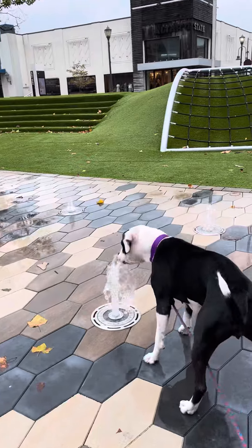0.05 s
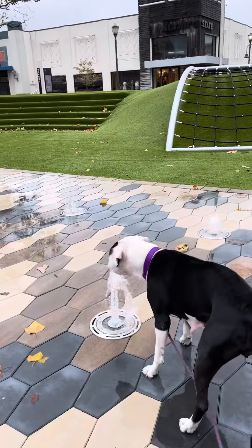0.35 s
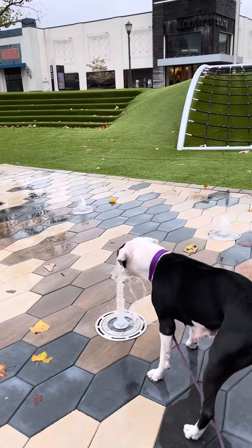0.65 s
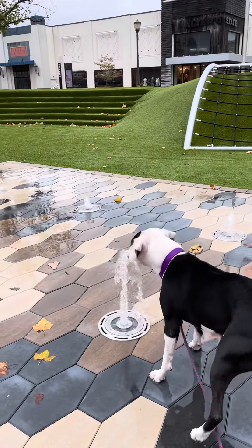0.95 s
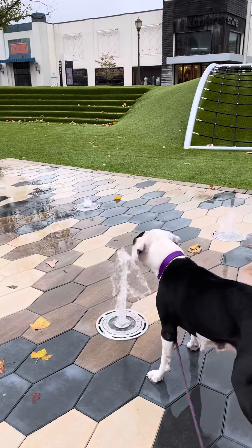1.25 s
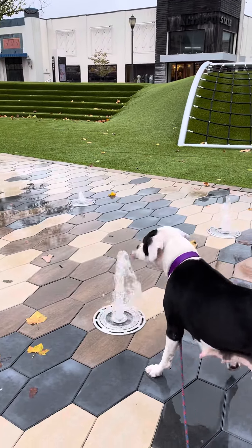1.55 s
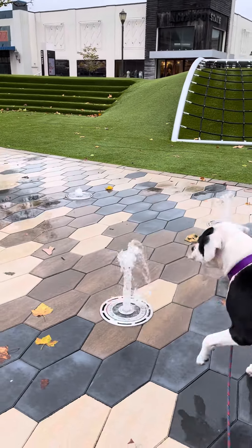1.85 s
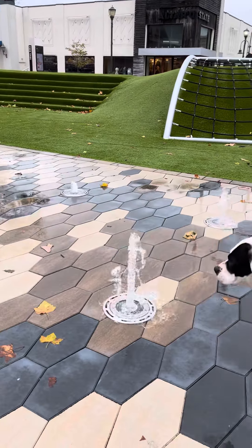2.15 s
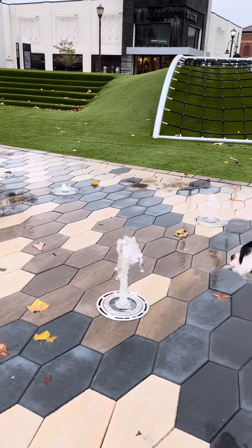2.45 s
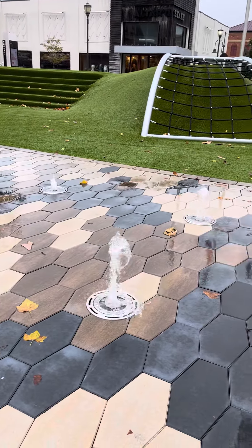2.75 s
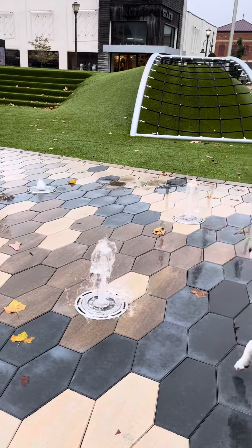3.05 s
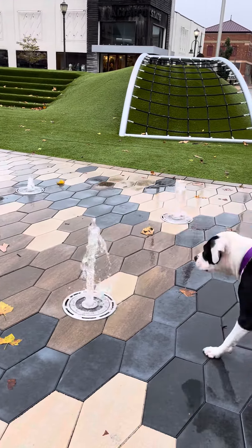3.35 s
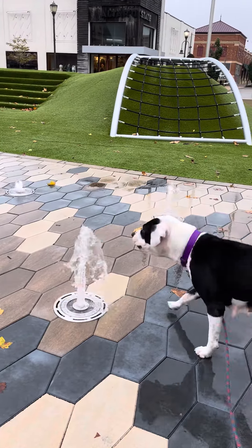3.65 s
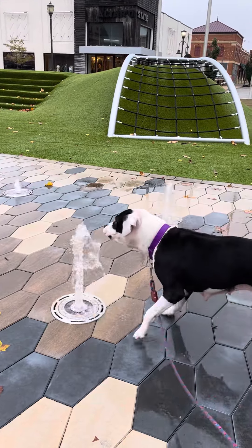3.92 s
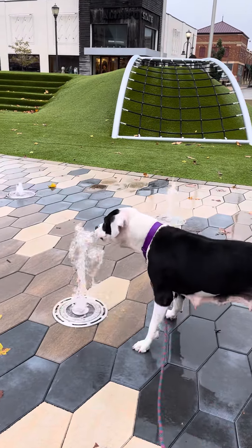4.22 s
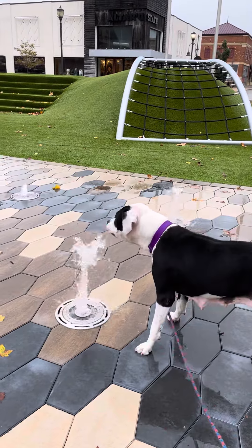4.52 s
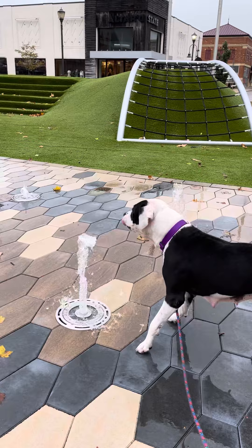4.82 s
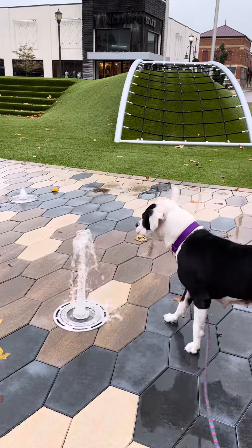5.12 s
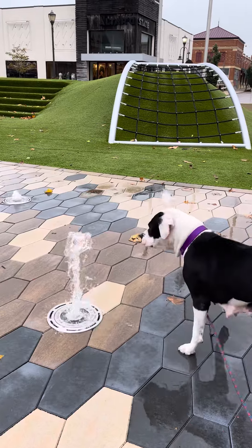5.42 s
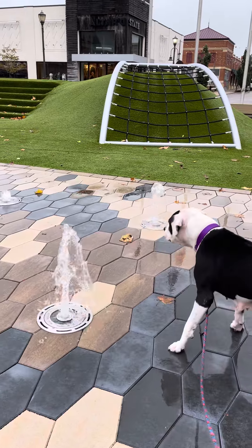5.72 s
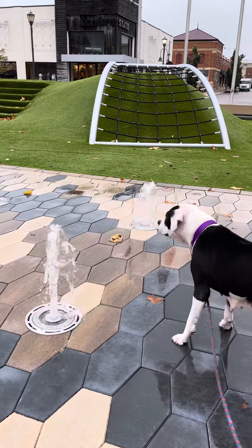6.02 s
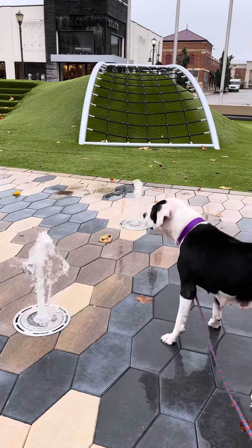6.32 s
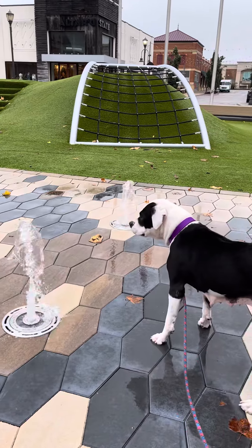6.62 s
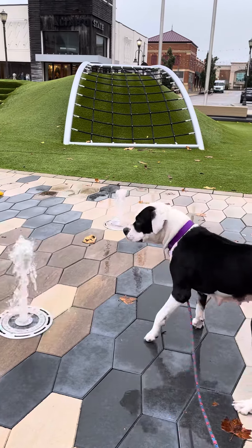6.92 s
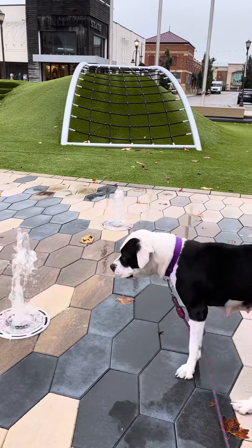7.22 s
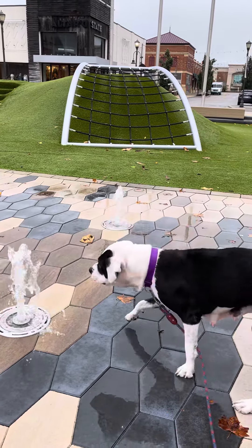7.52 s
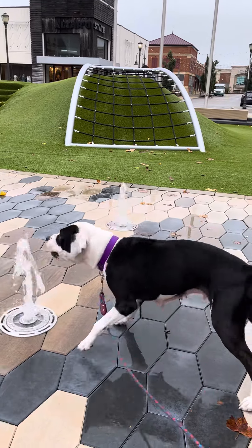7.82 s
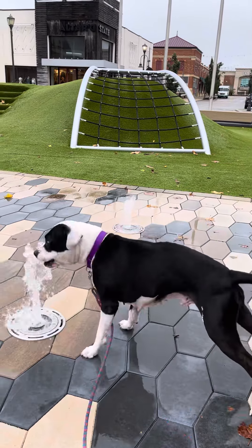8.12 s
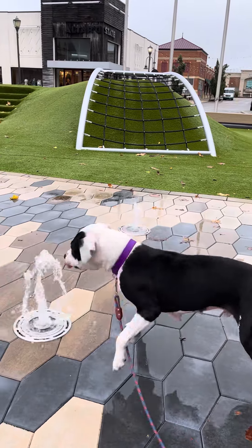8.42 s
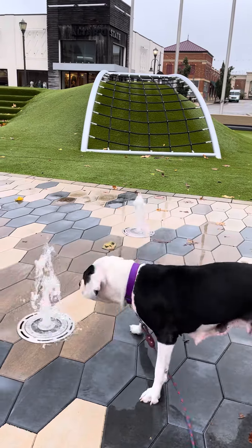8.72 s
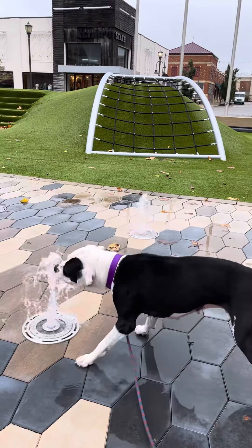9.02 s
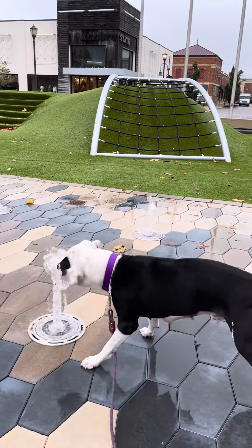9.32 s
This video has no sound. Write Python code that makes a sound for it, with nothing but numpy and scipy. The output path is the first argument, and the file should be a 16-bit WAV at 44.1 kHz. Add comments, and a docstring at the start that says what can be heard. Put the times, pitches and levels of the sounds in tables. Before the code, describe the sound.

A low fountain jet splashes continuously onto wet paving close to the microphone, a bright crackling spray full of pattering drops, sharp wet slaps, small gurgles and an occasional plop. The flow surges unevenly as the water collapses on itself. Farther jets hiss over the low hum of a town around the open plaza. Wind bumps the microphone softly and rumbles more in the second half.

```python
"""Fountain jet on wet paving

A low jet breaks into clumps and keeps collapsing onto the tiles of a plaza. Impacts radiate as slaps,
patter and crackling spray; air trapped by the water resonates as bubbles and plops. A breeze buffets
the two microphones, and farther jets hiss over the low hum of the town."""
import sys
import numpy as np
from scipy import signal
from scipy.fft import rfft, irfft
from scipy.io import wavfile

SR = 44100
rng = np.random.default_rng(int(sys.argv[2]) if len(sys.argv) > 2 else 0)


def output_pcm(signal):
    """Save a mono or channel-first signal as 16-bit PCM at the path in sys.argv[1].

    Samples are clipped to [-1, 1] before scaling.
    """
    pcm = np.clip(np.atleast_2d(signal).T, -1, 1) * 32767
    wavfile.write(sys.argv[1], SR, np.round(pcm).astype(np.int16))


N = 417186
TIME = np.arange(N) / SR
HZ = np.fft.rfftfreq(N, 1 / SR)

# even fall of water from the near jet: time_s, level_db
EVEN_FALL = [(0, -35.0), (1.8, -34.5), (4.5, -33), (5.7, -32.5), (9.46, -32.5)]
# the top of the column coming down in one splash: centre_s, level_db, length_s
COLUMN_COLLAPSES = [(0.43, -33.5, 0.04), (0.91, -35.5, 0.05), (1.24, -33.0, 0.04), (1.689, -33.5, 0.09),
                    (2.16, -35.5, 0.14), (2.54, -32, 0.07), (2.66, -32.5, 0.14), (2.97, -34.0, 0.14),
                    (3.2, -34.5, 0.1), (3.58, -34.0, 0.1), (3.82, -31.0, 0.08), (3.959, -34.0, 0.04),
                    (4.5, -29.5, 0.07), (4.92, -32.5, 0.12), (5.205, -34.0, 0.07), (5.29, -34.5, 0.05),
                    (5.44, -33.0, 0.05), (6.2, -32.0, 0.07), (6.335, -33.5, 0.03), (6.51, -34.5, 0.05),
                    (6.66, -32.0, 0.025), (6.75, -34.0, 0.06), (7.0, -32.5, 0.1), (7.47, -32.5, 0.11),
                    (8.105, -30.0, 0.05), (9.03, -33.5, 0.09), (9.43, -31.5, 0.05)]


def falling_water():
    """Incoherent sources add in power: the level (dB) of the even fall plus a swell per collapse."""
    swells = sum(amp(db) ** 2 * np.exp(-(2 * (TIME - s) / length) ** 2)
                 for s, db, length in COLUMN_COLLAPSES)
    return 10 * np.log10(amp(curve(EVEN_FALL, TIME)) ** 2 + swells)


def clumps(per_s=130, drain_s=0.004, even_share=0.68):
    """Shot noise in the flow (dB): each clump of water arrives at once and drains exponentially."""
    arrivals = (rng.random(N) < per_s / SR) * rng.uniform(.5, 2, N)
    water = signal.lfilter([1], [1, -np.exp(-1 / (drain_s * SR))], arrivals)
    return 10 * np.log10(even_share + (1 - even_share) * water / water.mean())


# big lumps of water hitting the tiles: start_s, level_db, pitch_hz
BIG_LUMPS = [(0.9949, -17, 2670), (1.4134, -23.5, 1780), (1.6271, -20.5, 1940), (1.6817, -20, 2250),
             (2.1518, -20, 2000), (2.1813, -22, 2040), (2.231, -19, 2770), (2.7143, -19, 2270),
             (2.9948, -22, 2400), (3.1276, -23, 2420), (3.2241, -23, 2040), (3.5168, -20.5, 2000),
             (3.6261, -19, 2300), (3.8375, -17, 2100), (4.0394, -22, 1680), (4.1207, -22, 1780),
             (4.5089, -17, 2550), (4.8816, -21, 2240), (6.1591, -22.5, 2180), (6.2108, -23, 2650),
             (6.2821, -15, 2600), (6.5085, -30, 2200), (6.6543, -21, 2540), (6.7203, -17, 2390),
             (6.9847, -27, 2260), (7.4183, -19.5, 1960), (7.7114, -19, 2740), (8.0198, -17.5, 2200),
             (8.1273, -23, 2150), (8.6054, -17.5, 2300)]


def slaps(lumps):
    """Liquid impact: a lump cracks on stone, expels the air beneath it and traps a little that rings."""
    s, db, hz = np.transpose(lumps)
    crack = bursts(s, db - 12, 2 * hz, decay_s=0.00041, octaves=2.0, size=256)
    knock = np.outer([1, 0], knocks(s, db - 3, 0.9 * hz, cycles=1.4, glide=0.14, size=512))
    ring = rings(s, db - 14, hz, cycles=7.2, glide=0.04, size=2048)
    splat = bursts(s, db - 10.5, hz, decay_s=10 / hz, octaves=0.65, size=2048)
    spatter = bursts(s, db - 17, np.full(len(s), 7000), decay_s=0.024, octaves=0.59, size=2048)
    return crack + knock + ring + splat + spatter


def gurgles(max_lag_s=0.024, per_lump=3):
    """Fragmentation: each big lump sheds bubbles that resonate just after it at other pitches."""
    s, db, lump_hz = np.repeat(BIG_LUMPS, per_lump, axis=0).T
    lag, pitch = rng.random((len(s), 2)).T
    hz = lump_hz * 2 ** (0.65 * (2 * pitch - .7))
    return rings(s + max_lag_s * lag, db - 13, hz, cycles=6.5, glide=0.046, size=1536)


def small_lumps(flow_db, low_hz=2000, high_hz=3600):
    """Jet breakup drops lesser lumps at random: rows of start_s, level_db, pitch_hz."""
    s, db, rank = landings(flow_db, per_s=8.3, spread_db=-2.2)
    return np.transpose([s, db - 30, low_hz * (high_hz / low_hz) ** rank])


# spectrum of fine spray on stone: frequency_hz, density_db
SPRAY_SPECTRUM = [(400, -14), (1200, -22), (2200, -2.5), (3600, -2), (5000, -5), (7000, -2), (9000, 2),
                  (10800, 3), (15500, -25.5)]


def spray(flow_db):
    """Superposed impacts: drops crackle, clumps spatter and the finest merge into a surging hiss."""
    s, db, rank = landings(flow_db, per_s=480, spread_db=-1.0)
    drops = bursts(s, db, 3500 + 9000 * rank, decay_s=0.0009, octaves=0.76, size=128)
    s, db, rank = landings(flow_db, per_s=30, spread_db=-1.0)
    spatter = bursts(s, db, 5000 + 7000 * rank, decay_s=0.018, octaves=0.24, size=2048)
    mist = coloured(noise(), SPRAY_SPECTRUM) * amp(flow_db)
    grains = amp(-2) * coloured(drops, SPRAY_SPECTRUM) + amp(-8) * coloured(spatter, SPRAY_SPECTRUM)
    return np.std(mist) * grains + amp(-3) * mist


def patter(flow_db, level_db=-44.0, centre_hz=2550):
    """Impact on a water film: small lumps pat and splat; low ones are rare, softer and longer."""
    s, db, rank = landings(flow_db, per_s=70, spread_db=1.1)
    octave = np.clip(0.376 * np.log(rank / (1 - rank)), -1.7, .7)
    hz = centre_hz * 2 ** octave
    db = db + 5 * np.minimum(octave, 0)
    pats = np.array([knocks(s, db, hz, cycles=1.47, glide=0.11, size=768, variety=0.9) for _ in range(2)])
    splats = bursts(s, db - 4, hz, decay_s=10.7 / hz, octaves=0.53, size=1024)
    return amp(level_db) * unit(pats + splats)


# single fast drops close by: start_s, level_db
HARD_DROPS = [(1.085, -24), (1.2199, -13), (1.2324, -19), (2.9038, -18.5), (3.3590, -18), (3.5993, -16.5),
              (3.6239, -17.5), (3.8382, -15), (4.0208, -22), (4.4780, -17), (4.7535, -19), (4.8985, -21),
              (4.922, -20), (4.9565, -16), (4.9692, -16), (5.0987, -16.5), (5.1623, -14.5), (5.3093, -13),
              (6.3421, -20), (6.9453, -22), (7.1781, -17), (7.7118, -15.5), (8.1172, -19.5), (8.4868, -13),
              (9.4155, -14)]


def ticks(drops, centre_hz=8200):
    """Brief contact gives a bright spectrum: fast drops crack on bare tile and scatter."""
    s, db = np.transpose(drops)
    hz = np.full(len(s), centre_hz)
    crack = bursts(s, db + 2.5, hz, decay_s=0.001, octaves=0.45, size=512)
    scatter = bursts(s, db - 14, hz, decay_s=0.008, octaves=0.6, size=1024)
    return crack + scatter


def stray_drops(flow_db):
    """Splashing ejects lesser hard drops at random: rows of start_s, level_db."""
    s, db, _ = landings(flow_db, per_s=26, spread_db=1.0)
    return np.transpose([s, db - 29])


def bubbles(flow_db, level_db=-47.0, low_hz=1500, high_hz=4600, tilt_db=6):
    """Bubble resonance: air caught under splashes rings; large, low bubbles are rarer and softer."""
    s, db, rank = landings(flow_db, per_s=80, spread_db=2.5)
    height = np.sqrt(rank)
    hz = low_hz * (high_hz / low_hz) ** height
    return amp(level_db) * unit(rings(s, db + tilt_db * height, hz, cycles=10.2, glide=0.025, size=1536))


# water falling into the puddle round the nozzle: start_s, level_db, pitch_hz
PUDDLE_PLOPS = [(0.744, -31.5, 1040), (1.1075, -27, 1390), (1.863, -29, 1290), (1.9993, -29.5, 1350),
                (4.806, -29, 1410), (5.5076, -29, 1240), (5.7618, -29.5, 1090), (7.9127, -22.5, 1470),
                (8.0955, -18, 1080)]


def plops():
    """Air entrainment: water splats into the puddle and traps a large pocket that rings briefly."""
    s, db, hz = np.transpose(PUDDLE_PLOPS)
    splat = bursts(s, db - 7, 1.4 * hz, decay_s=0.007, octaves=0.65, size=2048)
    knock = np.outer([1, 0], knocks(s, db - 2.5, 0.964 * hz, cycles=2.1, glide=0.082, size=2048))
    ring = rings(s, db - 11, hz, cycles=7, glide=0.023, size=3072)
    return splat + knock + ring


# light air between gusts: time_s, level_db
LIGHT_BREEZE = [(0, -62), (3.3, -67), (5, -37.5), (9.46, -38.5)]
# gusts of wind: peak_s, level_db, fade_s
WIND_GUSTS = [(0.28, -40, 0.53), (0.62, -39, 0.083), (2.27, -38.5, 0.3), (3.58, -37.5, 0.1),
              (3.98, -31, 0.28), (4.6, -33, 0.17), (5.63, -31, 0.3), (7.51, -40, 0.035), (8.63, -29, 0.29),
              (8.85, -37, 0.15)]


def moving_air(rise_s=0.062):
    """Power summation: the level (dB) of the breeze plus gusts that swell and fade exponentially."""
    gusts = 0
    for s, db, fade_s in WIND_GUSTS:
        before, after = np.minimum(TIME - s, 0), np.maximum(TIME - s, 0)
        gusts += amp(db) ** 2 * np.exp(-(before / rise_s) ** 2 - after / fade_s)
    return 10 * np.log10(amp(curve(LIGHT_BREEZE, TIME)) ** 2 + gusts)


# spectrum of wind on the microphones: frequency_hz, density_db
WIND_SPECTRUM = [(15, -32), (35, -14), (55, 2.5), (85, -2.5), (130, -5), (200, -22), (400, -37.5),
                 (1500, -78)]
# dull buffets of air: start_s, level_db, initial_pitch_hz
WIND_BUFFETS = [(0.815, -20.5, 213), (1.247, -25, 112), (1.342, -24.5, 134), (1.537, -25.5, 170),
                (1.549, -24, 109), (1.726, -21, 265), (2.361, -26.5, 133), (2.414, -26, 111),
                (3.111, -28, 160), (3.942, -25, 83), (4.683, -25, 92), (7.563, -21.5, 96),
                (8.657, -19.5, 101), (8.761, -24, 88), (8.79, -24, 150), (8.853, -23.5, 72),
                (9.127, -24, 99)]


def wind(puff_hz=290):
    """Turbulent pressure at the microphones: a rumble, and thuds that open with a puff and sag in pitch."""
    rumble = coloured(noise(), WIND_SPECTRUM) * amp(moving_air() - 1 + 1.67 * wander(top_hz=6.6))
    s, db, hz = np.transpose(WIND_BUFFETS)
    thuds = np.outer([1, 0], knocks(s, db, hz, cycles=1.0, glide=-0.26, size=4096, variety=0.081))
    puffs = bursts(s, db - 13, np.full(len(s), puff_hz), decay_s=0.01, octaves=0.4, size=4096)
    return rumble + thuds + puffs


# spectrum of the farther jets: frequency_hz, density_db
FAR_JET_SPECTRUM = [(100, -19), (450, 3.5), (800, 4.5), (1400, 2.5), (2500, 3.5), (5000, 5.5),
                    (10500, -4.5)]


def far_jets(level_db=-39):
    """Broadband noise: the splashing of distant jets merges into a slightly wavering hiss."""
    return amp(level_db + 1.36 * wander(top_hz=8.0)) * coloured(noise(), FAR_JET_SPECTRUM)


# spectrum of the town: frequency_hz, density_db
TOWN_SPECTRUM = [(20, -25), (55, -6.5), (120, 1.5), (190, -1.5), (265, -2.5), (340, -9), (480, -22),
                 (1500, -28)]


def town(level_db=-41.0):
    """Ambient noise: the town is heard as a low, nearly steady hum."""
    return amp(level_db + wander(top_hz=6.3)) * coloured(noise(), TOWN_SPECTRUM)


def landings(flow_db, per_s, spread_db):
    """Random arrivals at a rate proportional to flow power: time (s), size (dB) and pitch rank (0-1)."""
    when, chance, rank = rng.random((int(per_s * N / SR), 3)).T
    fallen = np.cumsum(amp(flow_db) ** 2)
    size_db = -spread_db * np.log(np.maximum(chance, .025))
    return np.interp(when, fallen / fallen[-1], TIME), size_db, rank


def bursts(s, db, hz, decay_s, octaves, size):
    """Impact transients: bands of noise around hz with a sharp onset and an exponential decay."""
    age = np.arange(size) / SR / np.reshape(decay_s, (-1, 1))
    envelope = np.exp(-age) * (1 - np.exp(-20 * age))
    off_centre = np.log2((np.fft.rfftfreq(size, 1 / SR) + 1) / hz[:, None]) / octaves
    white = rng.standard_normal((2, len(s), size))
    puffs = irfft(rfft(white) * np.exp(-.5 * off_centre ** 2)) * envelope
    energy_ratio = (envelope ** 2).sum(-1, keepdims=True) / (puffs ** 2).sum(-1, keepdims=True)
    puffs *= amp(db)[:, None] * np.sqrt(energy_ratio)
    return np.array([placed(s, channel) for channel in puffs])


def knocks(s, db, hz, cycles, glide, size, variety=0.14):
    """Pressure pulses: pushes of air of varied length that peak after about `cycles` and glide in pitch."""
    phase, length, bend = rng.random((len(s), 3)).T[:, :, None]
    cycles = cycles * np.exp(variety * (2 * length - 1))
    turns = hz[:, None] * np.arange(size) / SR
    envelope = amp(db)[:, None] * (turns / cycles * np.exp(1 - turns / cycles)) ** 2
    turns = turns * (1 + 2 * bend * glide * np.tanh(turns / cycles / 4)) + phase
    return placed(s, envelope * np.sin(2 * np.pi * turns))


def rings(s, db, hz, cycles, glide, size):
    """Damped oscillation of trapped air: each pocket rises in pitch, with its own phase per channel."""
    turns = hz[:, None] * np.arange(size) / SR
    envelope = amp(db)[:, None] * np.exp(-turns / cycles) * (1 - np.exp(-2 * turns))
    turns = turns * (1 + glide * turns / cycles)
    phases = rng.random((len(s), 2)).T[:, :, None]
    return np.array([placed(s, envelope * np.sin(2 * np.pi * (turns + phase))) for phase in phases])


def placed(s, sounds):
    """Superposition: sums the rows of sounds into one track, each starting at its time s."""
    at = (np.maximum(s, 0) * SR).astype(int)[:, None] + np.arange(sounds.shape[1])
    return np.bincount(at.ravel(), sounds.ravel(), N)[:N]


def amp(db):
    """Decibels to amplitude ratio."""
    return 10 ** (np.asarray(db) / 20)


def unit(x):
    """Normalisation to rms 1."""
    return x / np.sqrt(np.mean(x ** 2) + 1e-20)


def curve(rows, s):
    """Linear interpolation of a time curve at the times s."""
    return np.interp(s, *np.transpose(rows))


def across(points):
    """Interpolation of a table on a log frequency axis."""
    hz, value = np.transpose(points)
    return np.interp(np.log(HZ + 1), np.log(hz), value)


def coloured(x, spectrum):
    """Spectral shaping of x, at rms 1."""
    return unit(irfft(rfft(x) * amp(across(spectrum)), N))


def noise():
    """Two uncorrelated channels of white noise."""
    return rng.standard_normal((2, N))


def wander(top_hz):
    """Slow random modulation of rms 1, with rates up to about top_hz."""
    white = rfft(rng.standard_normal(N))
    return unit(irfft(white * HZ / (HZ + top_hz / 10) / (1 + (HZ / top_hz) ** 2), N))


def scene():
    """Common modulation: one uneven flow drives the random splashes; wind and background add to them."""
    flow_db = falling_water() + 0.6 * wander(top_hz=11) + clumps()
    lumps_db = flow_db + 1.6 * wander(top_hz=15)  # lumps come down in bunches
    water = spray(flow_db) + patter(lumps_db) + bubbles(lumps_db)
    water = water + slaps(BIG_LUMPS) + slaps(small_lumps(lumps_db)) + gurgles() + plops()
    water = water + ticks(HARD_DROPS) + ticks(stray_drops(flow_db))
    return water + far_jets() + town() + wind()


# treble roll-off of the microphones: frequency_hz, gain_db
MICROPHONE_RESPONSE = [(11000, 2), (12000, 1.5), (13500, -5), (15500, -37)]
# likeness of the left and right channels: frequency_hz, coherence (0-1)
STEREO_COHERENCE = [(50, 0.96), (290, 0.84), (640, 0.74), (1200, 0.81), (1750, 1.0), (2400, 0.87),
                    (3300, 0.43), (4900, 0.75), (6000, 0.99), (7400, 0.74), (8500, 1.0), (9500, 1.0),
                    (11200, 0.87), (12200, 0.99)]
# phase by which the left channel leads the right: frequency_hz, lead_rad
STEREO_PHASE_LEAD = [(350, 0.05), (1100, 0.43), (1900, 0.02), (3100, 1.27), (4000, 0.37), (4500, 1.64),
                     (5100, 4.3), (5800, 6.26), (6400, 6.58), (8400, 9.3), (9600, 9.6), (11600, 11.87),
                     (12100, 12.55)]


def record(dry, band_limit_hz=15500):
    """Partial coherence: the left and right channels are partly alike, offset in phase and band-limited."""
    left, independent = rfft(dry) * amp(across(MICROPHONE_RESPONSE))
    coherence = np.clip(across(STEREO_COHERENCE), 0, 1)
    lag = np.exp(-1j * across(STEREO_PHASE_LEAD))
    right = (coherence * left + np.sqrt(1 - coherence ** 2) * independent) * lag
    pair = irfft(np.array([left, right]), N)
    lowpass = signal.firwin(511, band_limit_hz, window=("kaiser", 9), fs=SR)
    return signal.oaconvolve(pair, lowpass[None], "same")


dry = scene()
out = record(dry)
output_pcm(out)
```